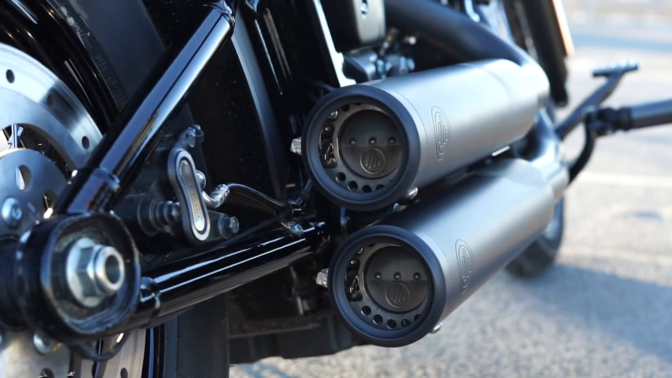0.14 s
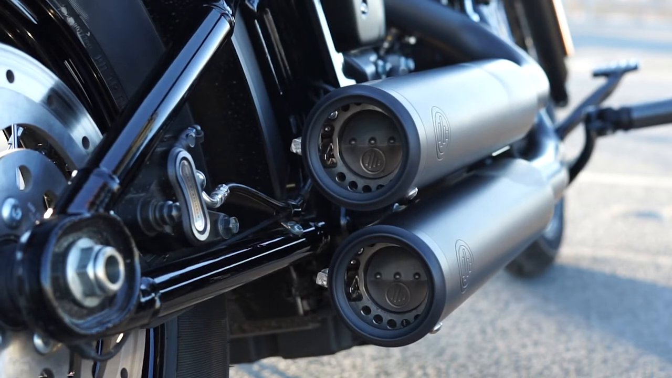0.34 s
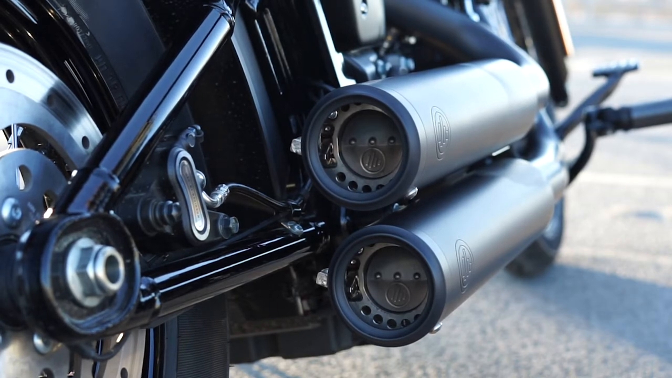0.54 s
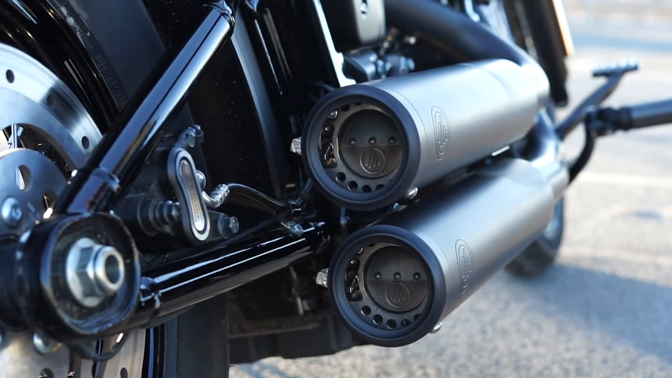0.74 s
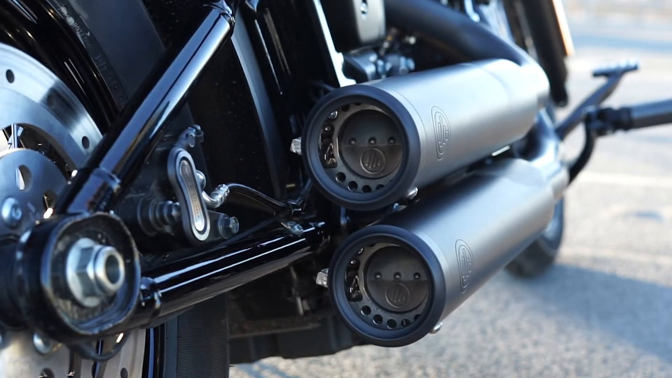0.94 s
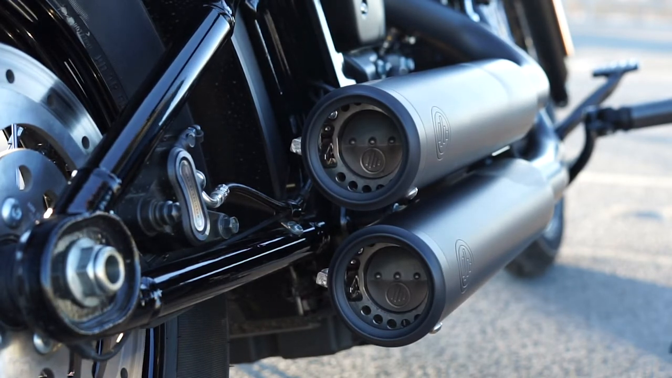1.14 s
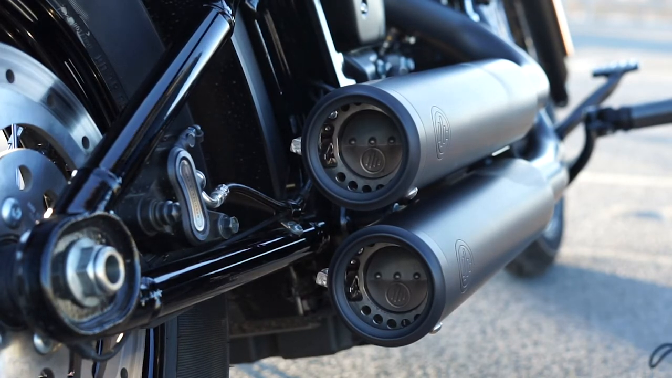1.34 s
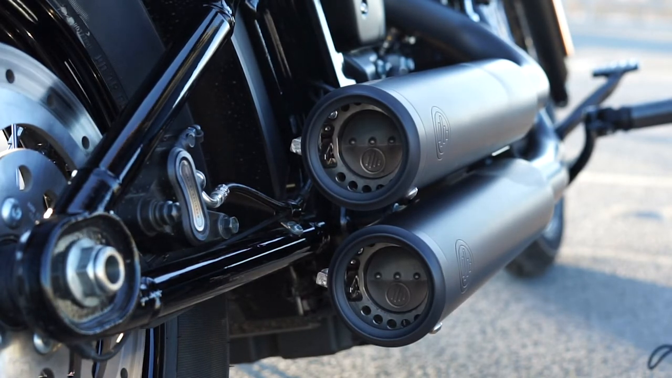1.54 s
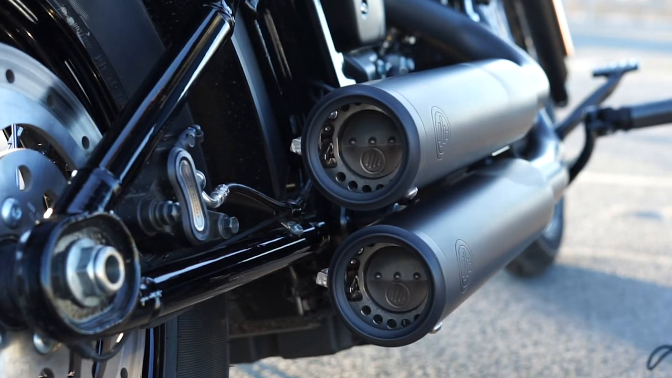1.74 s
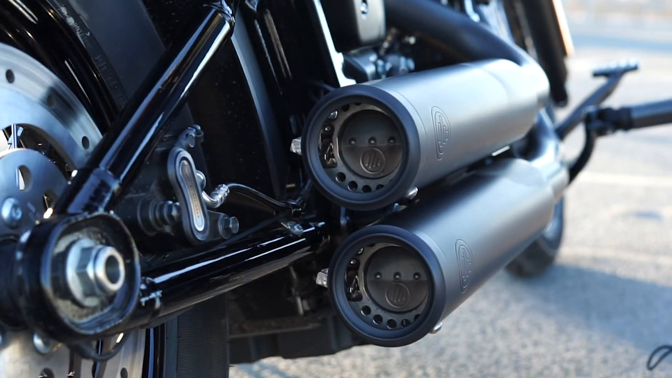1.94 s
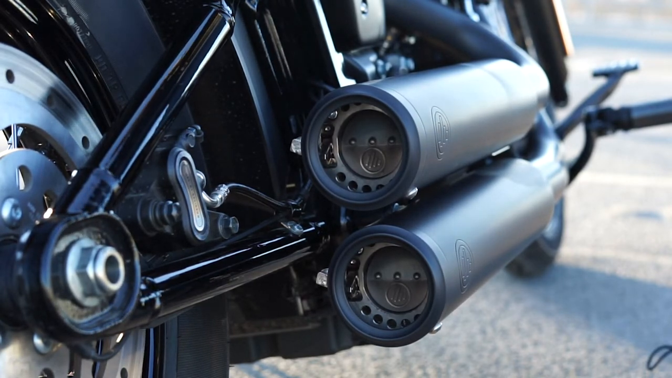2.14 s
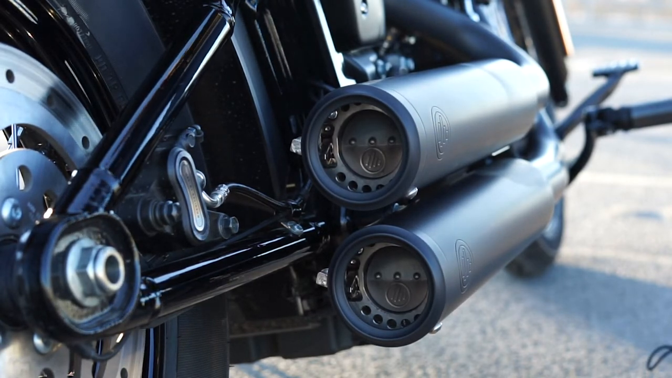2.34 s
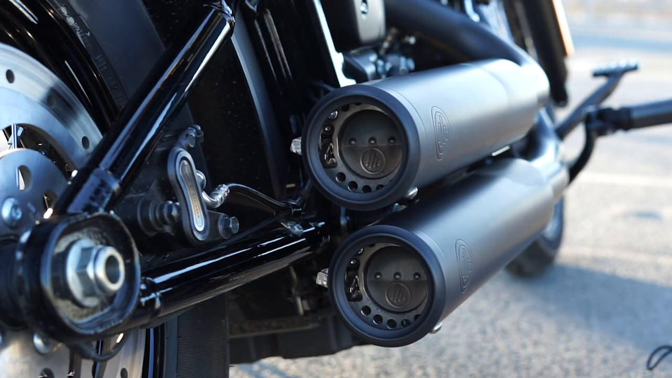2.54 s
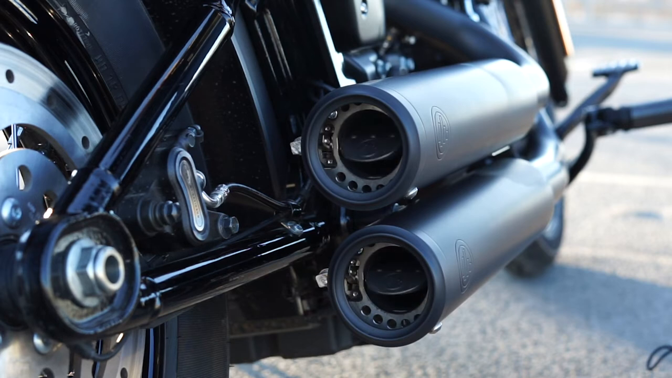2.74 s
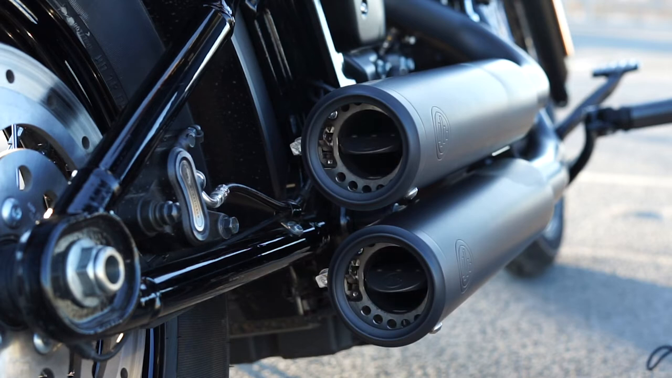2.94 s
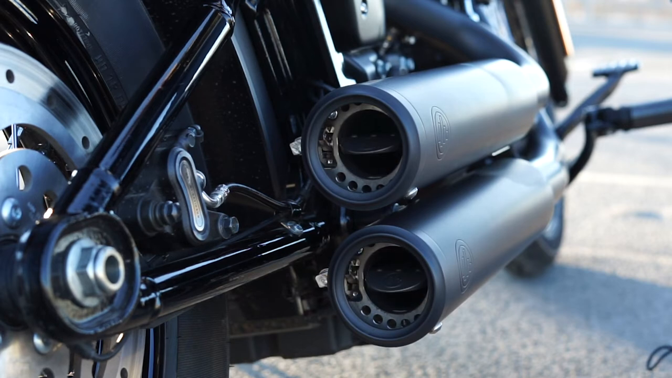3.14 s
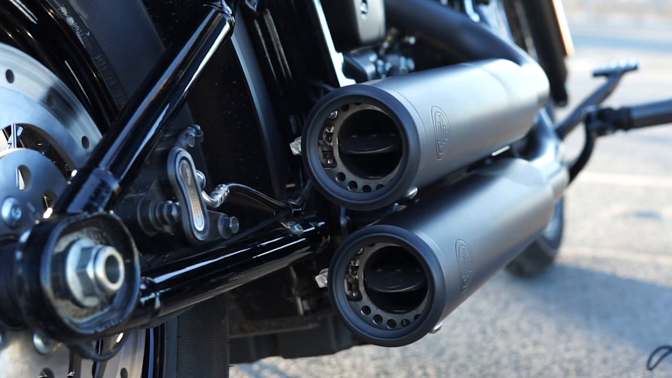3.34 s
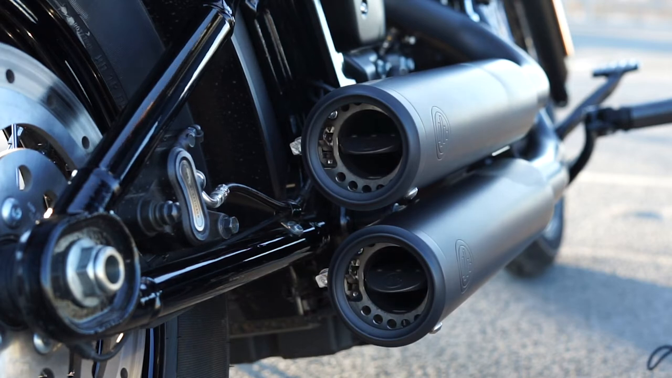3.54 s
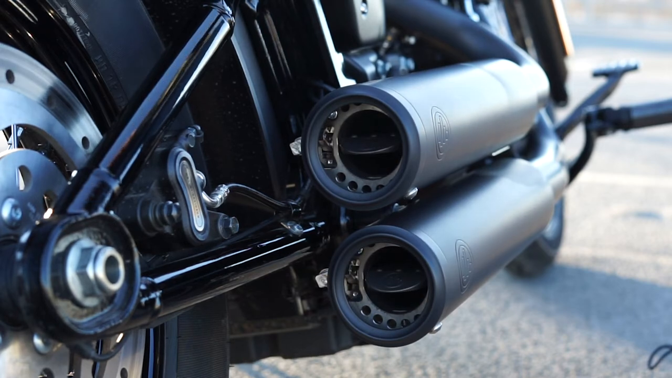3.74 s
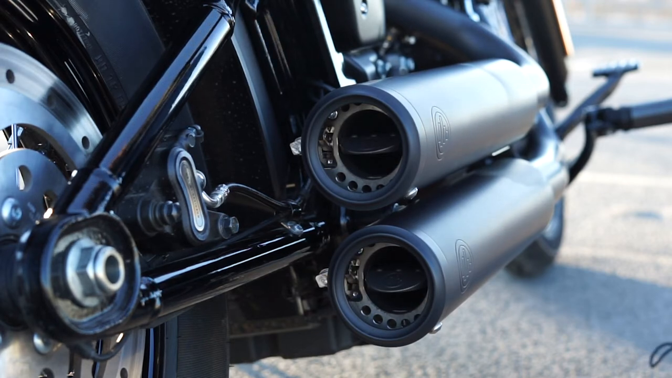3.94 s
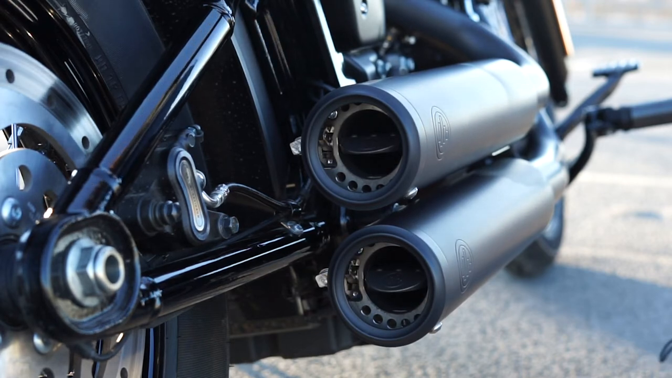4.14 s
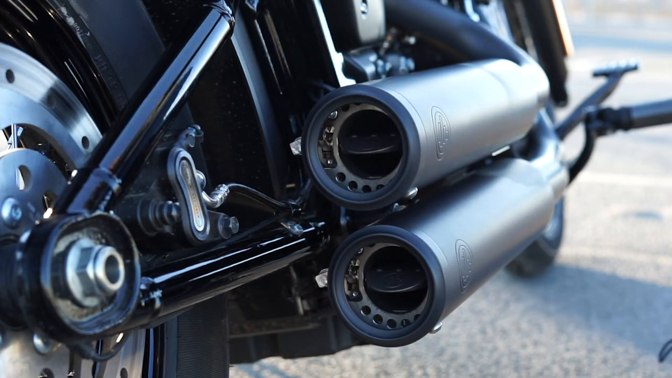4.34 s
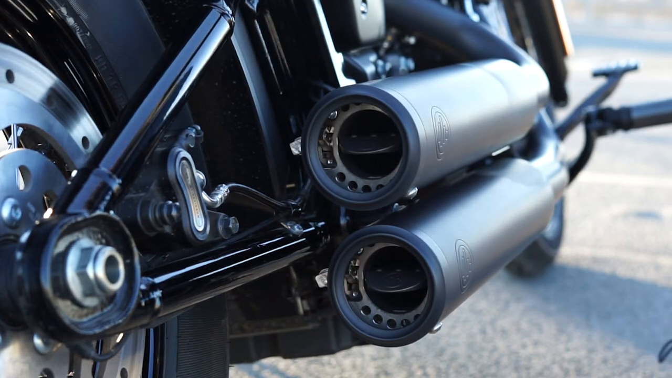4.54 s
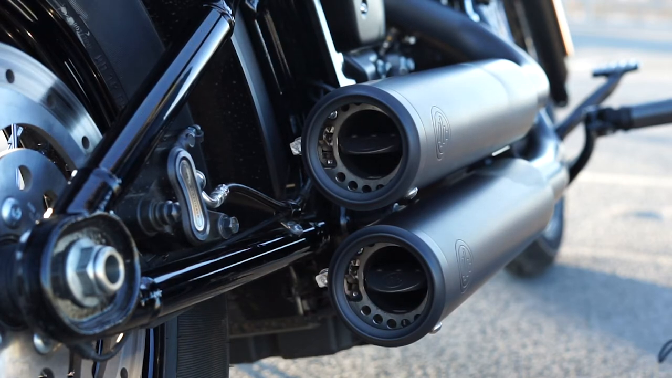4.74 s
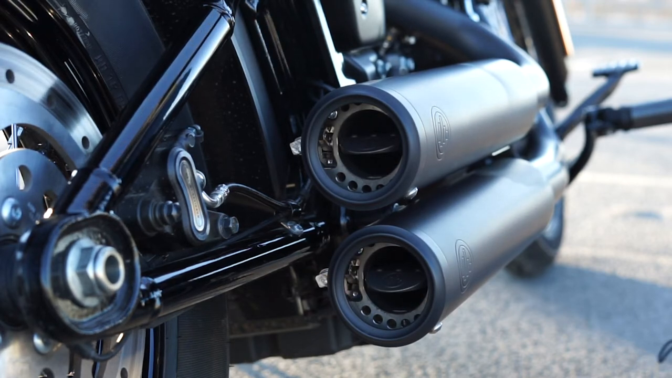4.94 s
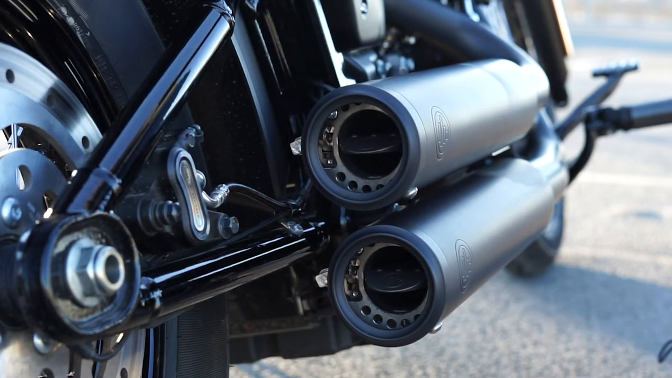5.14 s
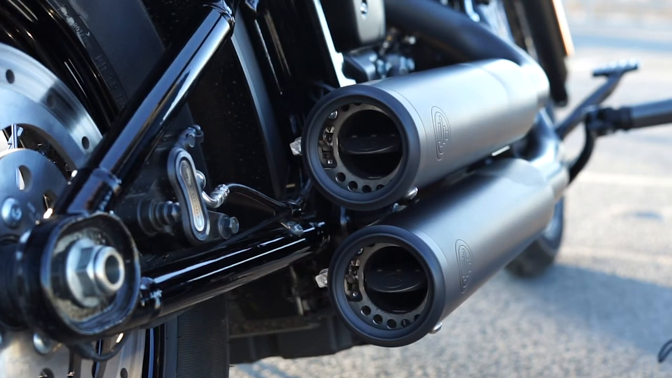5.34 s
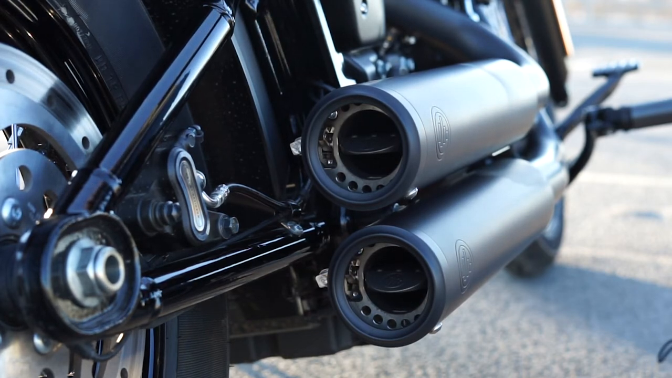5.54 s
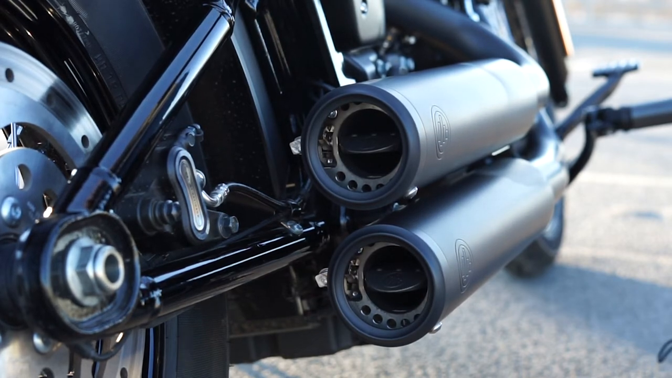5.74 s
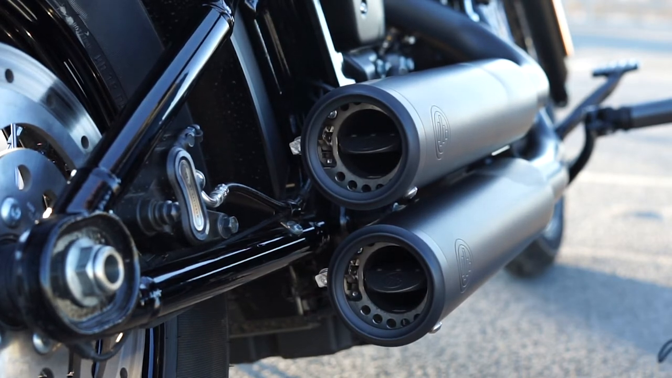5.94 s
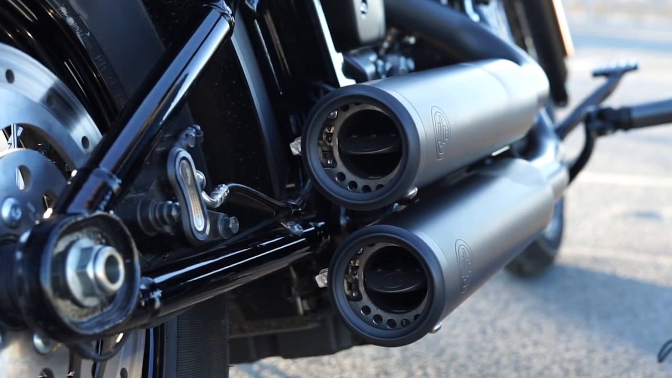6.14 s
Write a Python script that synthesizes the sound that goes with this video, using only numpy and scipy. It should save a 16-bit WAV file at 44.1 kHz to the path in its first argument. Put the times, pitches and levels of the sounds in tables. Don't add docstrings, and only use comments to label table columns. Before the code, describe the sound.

A big twin-cylinder motorcycle heard outdoors, very close behind its two silencers. Revs drop quickly to a lumpy, muffled idle of dull paired thumps, with soft air hiss and mechanical clatter. Nearly halfway through, the exhaust flaps open with a brief rush of gas and the idle turns loud, deep and spitting. Near the end a quick throttle blip roars and begins to fall, with wind buffeting the microphone.

```python
import sys
import numpy as np
from scipy import signal
from scipy.fft import rfft, irfft
from scipy.io import wavfile
from scipy.ndimage import uniform_filter1d

SR = 44100
rng = np.random.default_rng(int(sys.argv[2]) if len(sys.argv) > 2 else 0)


def voltage_ratio(decibels):
    exponent = np.asarray(decibels, float) / 20
    return 10 ** exponent


def pcm_store(signal):
    levels = np.round(np.clip(np.atleast_2d(signal), -1, 1) * 32767)
    wavfile.write(sys.argv[1], SR, levels.astype(np.int16).T)


N = 277389
TIME = np.arange(N) / SR

REAR, FRONT = .14, .715
FLAP_S = (2.72, 2.78)
BLIP_S, OVERRUN_S = (5.79, 5.99), 6.04
IDLE_HZ = 8.3
START_HZ, SAG_HZ_PER_S = 8.74, 11.6
# (t/s, beat level/dB, firing strength/dB)
EFFORT = [(0, -12.5, -4), (.1, -13.5, -10), (.33, -14.5, -10), (.5, -19, -12), (.6, -17, -10),
          (.665, -15, -6.5), (1.0, -16, 3), (2.1, -13, -1), (2.58, -14.5, 2.5), (2.7, -10, 1),
          (2.82, -7.5, -3), (4.1, -9, 0), (5.68, -11.5, 0.9), (5.8, -7, -7), (5.9, -11.5, 1.3),
          (6.01, -10.5, 2), (6.18, -6.5, -12), (6.29, -7.5, -2)]


def colour(spectrum):
    hz, db = np.transpose(spectrum)
    bins = np.arange(1, N // 2 + 2) * SR / N
    gain = voltage_ratio(np.interp(np.log(bins), np.log(hz), db))
    x = irfft(rfft(rng.standard_normal(N)) * gain, N)
    return x / x.std()


def wander(rate):
    k = int(SR / rate)
    held = np.repeat(rng.standard_normal(N // k + 1), k)
    return 1.3 * uniform_filter1d(uniform_filter1d(held, k), k)[:N]


def beats(turn, place, db, lag_s=0):
    out = np.zeros(N)
    at = np.searchsorted(turn, np.arange(len(db)) + place)
    ok = (at > 0) & (at + lag_s * SR < N - 1)
    out[at[ok] + int(lag_s * SR)] = voltage_ratio(db[ok])
    return out


def swell(turn, place, db, width_ms):
    t_ms = np.linspace(-40, 40, 2 * SR // 25 + 1)
    bell = np.exp(-.5 * (t_ms / width_ms) ** 2)
    return np.abs(signal.fftconvolve(beats(turn, place, db), bell, "same"))


def ring(pulses, modes, push_ms):
    t = np.arange(SR // 8) / SR
    tail = 0
    for hz, decay_ms, db in modes:
        tail = tail + voltage_ratio(db) * np.exp(-t * 1000 / decay_ms) * np.cos(2 * np.pi * hz * t)
    lead_ms = np.linspace(-10, 10, SR // 50 + 1)
    push = np.exp(-.5 * (lead_ms / push_ms) ** 2)
    push = push - .58 * np.exp(-.5 * ((lead_ms + 3.5) / push_ms) ** 2)
    shape = np.convolve(tail, push / (push_ms * SR / 400))
    return signal.fftconvolve(pulses, shape)[SR // 100:][:N]


def octaves_above_idle(cycles_per_s):
    return np.maximum(np.log2(cycles_per_s / IDLE_HZ), 0)


def crank():
    # (t/s, cycles turned so far at idle speed/cycles)
    idle = [(-0.038, 0.34), (1.015, 9.71), (1.506, 13.71), (1.733, 15.71), (2.083, 18.71), (2.447, 21.71),
            (2.699, 23.71), (2.943, 25.71), (3.456, 29.71), (3.697, 31.71), (3.832, 32.72), (4.181, 35.71),
            (4.81, 40.71), (4.927, 41.71), (5.173, 43.71), (5.438, 45.71), (5.75, 48.3), (6.367, 53.26)]
    extra_hz = np.maximum(START_HZ - SAG_HZ_PER_S * TIME, 0)
    extra_hz = extra_hz + 54.85 * (np.clip(TIME, *BLIP_S) - BLIP_S[0])
    extra_hz = extra_hz - 11.25 * np.maximum(TIME - BLIP_S[1], 0)
    return np.interp(TIME, *np.transpose(idle)) + np.cumsum(extra_hz) / SR


def add(db, turn, odd):
    s, change_db = np.transpose(odd)
    db[np.interp(s, TIME, turn).astype(int)] += change_db


def firings(turn):
    # (t/s, firing change/dB)
    burn_odd = [
        (.05, 4),
        (.31, 4),
        (.75, 6),
        (1.22, -4),
        (1.33, 1.5),
        (2.65, 2.5),
        (3.02, -4.5),
        (4.01, -2),
        (4.87, 2),
    ]
    # (t/s, puff change/dB)
    rear_odd = [(.60, 15), (2.72, -0.5), (2.84, -10), (2.96, -18), (3.09, 0), (3.22, -22), (3.47, -5),
                (3.59, -6.5), (3.71, -22), (3.85, 2), (3.96, -9), (4.20, -13), (4.45, -10), (4.57, 3.5),
                (4.94, -4.5), (5.19, -14), (5.70, -13), (6.02, 3)]
    front_odd = [(.86, -13), (.98, -12), (1.22, -26), (1.58, 2.5), (2.79, 5.5), (2.90, 4), (3.03, -7),
                 (3.28, 3.5), (3.41, 2.5), (4.27, -6), (5.01, -4), (5.13, 0), (5.26, -3), (5.39, 2.5),
                 (5.52, 1.5), (5.64, -3), (5.76, 4.5), (5.99, -2), (6.03, 3)]
    # (t/s, hiss change/dB)
    draught_odd = [
        [(.82, 1.5), (.94, -4.5), (1.30, -5.5), (1.42, 1.5), (1.54, -2), (1.66, 2)],
        [(.88, 3.5), (1.00, -1.5), (1.24, 2), (1.60, -2.5), (2.07, 2), (2.42, 0), (2.55, 2), (2.68, -2)],
    ]
    puff_shut_db, puff_per_octave_db = (-42.5, -30.5), (12, 5.5)
    puff_open_db = (-13.5, -9)
    puff_throttle_db, puff_overrun_db = (-5.5, -6), (-49, -26.5)
    hiss_shut_db, hiss_open_db = (-25, -24), (-45, -50)

    s = np.interp(np.arange(int(turn[-1]) + 3), turn, TIME)
    chance = rng.standard_normal((len(s), 6)).T
    octaves = octaves_above_idle(np.interp(s, TIME, np.gradient(turn) * SR))
    at, beat_db, firing_db = np.transpose(EFFORT)
    beat_db, firing_db = np.interp(s, at, beat_db), np.interp(s, at, firing_db)
    add(firing_db, turn, burn_odd)
    opened = s > FLAP_S[0] - .05
    throttle = (s > BLIP_S[0]) & (s < BLIP_S[1])
    draw_db = 25 * np.maximum(s - BLIP_S[1], 0) + 0.5 * (s < START_HZ / SAG_HZ_PER_S + .05)
    puff_db, hiss_db = [], []
    for k, odd in enumerate((rear_odd, front_odd)):
        muffled_db = puff_shut_db[k] + puff_per_octave_db[k] * octaves
        puff = np.where(opened, beat_db + puff_open_db[k], muffled_db)
        puff = np.where(throttle, puff_throttle_db[k], puff)
        puff = np.where(s > OVERRUN_S, puff_overrun_db[k], puff) + 1.6 * chance[k] * ~opened
        add(puff, turn, odd)
        puff_db.append(puff)
        hiss = np.where(opened, hiss_open_db[k] + 9.5 * octaves, hiss_shut_db[k] + 4.5 * octaves)
        hiss = hiss + draw_db + 0.7 * chance[k + 2]
        add(hiss, turn, draught_odd[k])
        hiss_db.append(hiss)
    return beat_db + .5 * chance[4], firing_db + .9 * chance[5], puff_db, hiss_db


def pipes(turn, flap, beat_db, firing_db, puff_db):
    # (f/Hz, decay/ms, level/dB)
    crack_shut, crack_open = [(121, 18, 4), (300, 9, -16)], [(134, 13, 1), (320, 4, -6)]
    blow_shut, blow_open = [(85, 2.1, 23), (203, 10, -8)], [(76, 17, 10.5), (156, 6.6, 9), (34, 18, -7)]
    close_shut, close_open = [(51, 6.8, 15), (125, 16, 3.5), (338, 8, -13)], [(100, 10, 16), (143, 28, -1.5)]
    # (f/Hz, decay/ms, level/dB)
    can_shut, can_open = [(164.4, 6.8, -1.5), (223, 15, -9), (280, 6.6, -14.5)], [(174, 8.5, -10.5), (236.8, 29.4, -6), (280, 3.6, -10.5)]

    cycles = np.arange(len(beat_db))
    spread = rng.standard_normal((len(beat_db), 6)).T
    muted = crack = blow = close = dip = 0
    choke_db = np.where(flap[np.searchsorted(turn[:-1], cycles)] < .5, -5, 0)
    speed = np.log2(np.gradient(turn) * SR / IDLE_HZ)
    ease_db = -3.5 * np.interp(cycles, turn, speed)
    for k, place in enumerate((REAR, FRONT)):
        strong_db = 2 * np.clip(puff_db[k] + 24, -6, 2)
        muted_db = beat_db + 2 * np.clip(puff_db[k] + 28, -8, 1)
        muted = muted + beats(turn, place - .119, muted_db)
        crack = crack + beats(turn, place - .109, beat_db + strong_db)
        blow_db = beat_db + firing_db + (choke_db - 1, 0)[k] + 1.3 * spread[k + 2]
        blow = blow + beats(turn, place - .048 + .004 * spread[k], blow_db, .006)
        close_db = beat_db + ease_db + (-2.7, 0)[k] + .9 * spread[k + 4]
        close = close + beats(turn, place + (.283, .279)[k], close_db)
        dip = dip + swell(turn, place - .06, beat_db + np.minimum(strong_db, -1) + 2 * ease_db, 4.5)

    shut = ring(muted, crack_shut, 1.15) + ring(blow, blow_shut, 1.95) + ring(close, close_shut, 1.33)
    wide = ring(crack, crack_open, 1.3) + ring(blow, blow_open, 1.95) + ring(close, close_open, 2)
    wide = wide - voltage_ratio(-11) * dip
    coasting_db = -np.minimum(np.interp(turn, cycles, firing_db), 0)
    hurry = voltage_ratio(2.4 * speed + 0.62 * coasting_db)
    shut = shut + hurry * ring(muted + blow + close, can_shut, 0.72)
    wide = wide + hurry * ring(crack - blow + close, can_open, 0.95)
    churn = np.abs(ring(crack + blow, [(0.72, 16.5, -7.5)], 1.27))
    churn = churn * colour([(90, -7), (170, 1.0), (240, -2.5), (330, -7.5), (480, -46), (3000, -85)])
    shut, wide = shut + hurry * voltage_ratio(2.0) * churn, wide + hurry * churn
    return voltage_ratio(-2.5) * (1 - flap) * shut + voltage_ratio(1.53) * flap * wide


def gas(turn, flap, puff_db, hiss_db):
    # (f/Hz, level/dB)
    leak_colour = [(530, -37), (900, -21.5), (1160, -7.5), (1660, -5), (2680, -9.5), (3360, -1),
                   (4640, -13), (5300, -8.5), (5970, -14.5), (8560, -11), (10500, -19), (14000, -18.5),
                   (15800, -24.5)]
    whistle_colour = [(400, 3.5), (780, 5), (1100, -2.5), (2200, -1), (2850, 11), (3300, 2.5), (4250, -8.5),
                      (4800, 5), (5500, -17.5), (6700, -10.5), (7300, -16), (8300, -11), (10000, -17.5),
                      (15800, -25.5)]
    roar_colour = [(290, -5), (500, 3.5), (578, -12), (771, 0.5), (1030, -9), (2060, -11.5), (2950, -7.5),
                   (4820, -14.5), (5490, -20.5), (12900, -27.5), (15800, -39)]

    puff = swell(turn, REAR - .07, puff_db[0], 3.4) + swell(turn, FRONT - .062, puff_db[1], 3.03)
    hiss = swell(turn, REAR + 0.19, hiss_db[0], 6.4) + swell(turn, FRONT + 0.19, hiss_db[1], 4.8)
    roar = np.clip(puff / voltage_ratio(-12) - .6, 0, 1)
    whistle = flap * puff * (1 - roar) * colour(whistle_colour) * voltage_ratio(-1.0 + 0.6 * wander(300))
    seep = (1 - flap) * voltage_ratio(-45.0)
    rush = voltage_ratio(-30.5) * np.exp(-.5 * ((TIME - 2.715) / 0.043) ** 2)
    leak = ((1 - flap) * puff + hiss + seep + rush) * colour(leak_colour) * voltage_ratio(1.5 * wander(200))
    suction = .35
    return whistle + leak + puff * roar * (colour(roar_colour) * voltage_ratio(0.5) - suction)


def buffet(turn):
    coasting = np.interp(TIME, (BLIP_S[0] - .1, BLIP_S[0], OVERRUN_S, OVERRUN_S + .05), (1, 0, 0, 1))
    octaves = octaves_above_idle(np.gradient(turn) * SR) * coasting
    wind = colour([(10, -15), (28, 6), (45, 3), (75, -34), (300, -80)])
    return wind * voltage_ratio(-33 + 14 * octaves)


def casing(turn, flap):
    octaves = octaves_above_idle(uniform_filter1d(np.gradient(turn) * SR, SR // 10))
    at, beat_db, firing_db = np.transpose(EFFORT)
    beat_db = uniform_filter1d(np.interp(TIME, at, beat_db), SR // 4)
    throttle = np.interp(TIME, (BLIP_S[0], BLIP_S[1], 6.2), (0, 1, 0), left=0)
    clatter_db = (1 - flap) * -23 + flap * -29 + 0.71 * beat_db
    clatter_db = clatter_db + 4.5 * octaves - 4.5 * throttle
    hum_db = -32 + 12.5 * octaves * (1 - 2 * flap) + 2 * wander(9)
    hum_db = hum_db + (3.5 - 3 * (TIME - FLAP_S[1])) * flap
    return clatter_db, hum_db + 0.65 * np.minimum(np.interp(TIME, at, firing_db), 0)


def engine(turn, flap, beat_db):
    # (f/Hz, level/dB)
    metal = [(350, -8), (600, 2), (688, -9.5), (778, -2), (955, -5), (2080, -10), (2850, -7.5), (4180, -19),
             (4800, -21), (6130, -28), (8400, -31), (12800, -34.5), (15800, -58)]
    clatter_db, hum_db = casing(turn, flap)
    ticking = voltage_ratio(0.27 * np.cos(8 * np.pi * turn) + 1.0 * wander(60))
    clatter = colour(metal) * ticking * voltage_ratio(clatter_db + 2.0)

    shaft = uniform_filter1d(turn, SR // 10, mode="nearest")
    shaft = shaft + .003 * np.sin(4 * np.pi * turn)
    whine = np.sin(2 * np.pi * 170 * shaft + .7 * wander(90))
    sing_db = 22 * np.clip(np.log2(np.gradient(shaft) * SR / IDLE_HZ), 0, .45)
    whine *= voltage_ratio(clatter_db - 15 - 8 * flap + sing_db + 2 * wander(45))

    hum = colour([(380, -21), (500, -9.5), (534, 8.5), (575, -7.0), (720, -61)]) * voltage_ratio(hum_db - 3.5)
    load_db = np.interp(turn, np.arange(len(beat_db)), beat_db)
    rumble = colour([(15, -12), (30, -3), (60, -3), (95, 0), (130, -4), (250, -12), (420, -24),
                     (900, -45), (3000, -90)]) * voltage_ratio(load_db - 17.5)
    whistle = voltage_ratio(-72 + 2.5 * wander(6)) * np.sin(2 * np.pi * 12600 * TIME + .8 * wander(30))
    return clatter + whine + hum + rumble + whistle


def scene():
    turn = crank()
    flap = np.interp(TIME, FLAP_S, (0, 1))
    beat_db, firing_db, puff_db, hiss_db = firings(turn)
    bike = pipes(turn, flap, beat_db, firing_db, puff_db)
    bike = bike + gas(turn, flap, puff_db, hiss_db)
    bike = bike + buffet(turn)
    bike = bike + engine(turn, flap, beat_db)
    return bike[None]


def low_pass(x):
    return signal.sosfilt(signal.butter(12, 15910, fs=SR, output="sos"), x)


def record(dry):
    x = signal.sosfilt(signal.butter(1, 22, "high", fs=SR, output="sos"), dry)
    x = x / (1 + np.abs(x) ** 9) ** (1 / 9)
    x = signal.sosfilt(signal.ellip(10, .2, 60, 15880, fs=SR, output="sos"), x)
    return low_pass(x)


dry = scene()
out = record(dry)
pcm_store(out)
```